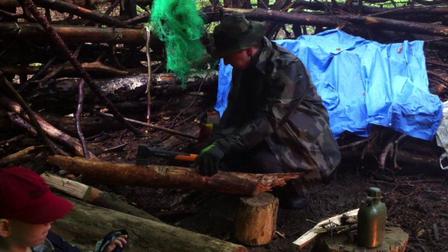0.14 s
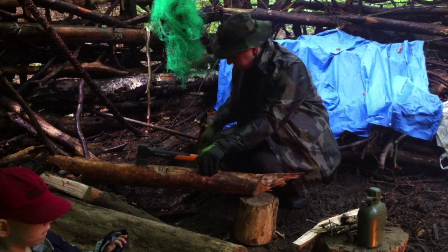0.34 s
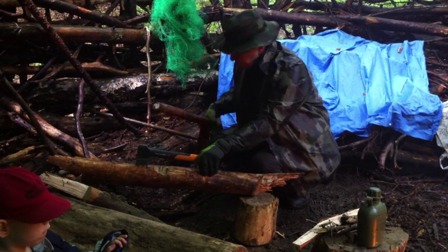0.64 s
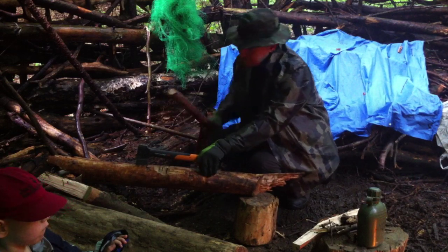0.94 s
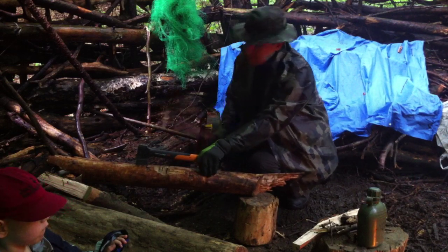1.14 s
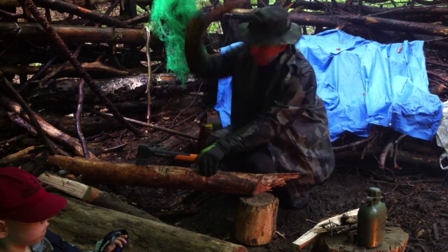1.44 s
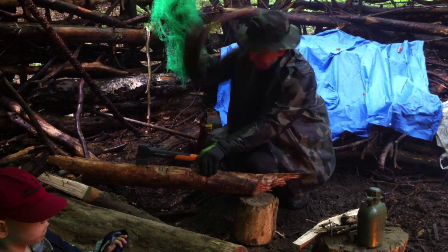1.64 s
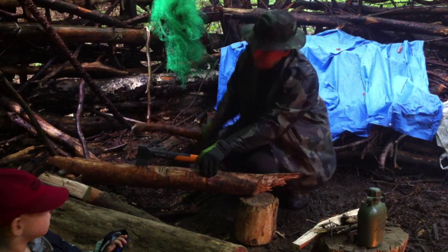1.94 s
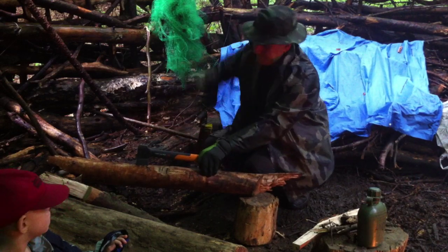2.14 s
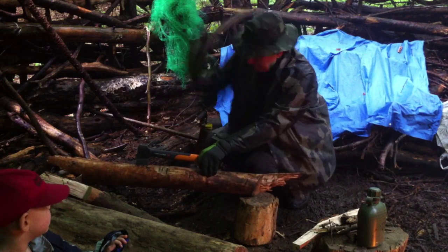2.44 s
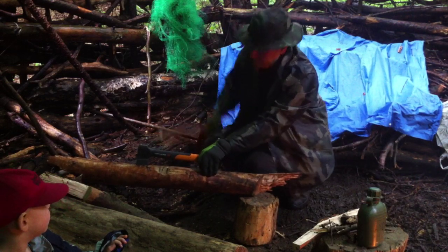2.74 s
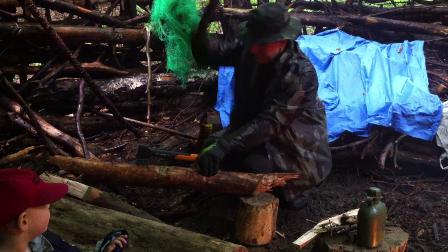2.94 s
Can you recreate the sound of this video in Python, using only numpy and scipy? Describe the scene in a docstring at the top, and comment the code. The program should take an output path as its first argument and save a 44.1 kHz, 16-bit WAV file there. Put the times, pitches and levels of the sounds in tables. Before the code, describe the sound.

Wood knocking on a hatchet in a dry log, tapping lightly, then striking hard outdoors.

```python
"""In a wood, a worker's jacket rustles over a low rumble and twigs tick underfoot. A hatchet is seated on
a hard dry log with a hollow tock, and a bird whistles far off. A wooden baton taps the hatchet, once
sharply, and the soil thuds under shifting weight. Two hard knocks then crush fibres, ring log and steel
and overload the microphone; hatchet and log clack as they settle. The woods echo each blow; the sound
of the lighter taps also bounces off the soil."""
import sys
import numpy as np
from scipy import signal
from scipy.fft import rfft, irfft, next_fast_len
from scipy.io import wavfile
from scipy.ndimage import map_coordinates

SR = 44100
rng = np.random.default_rng(int(sys.argv[2]) if len(sys.argv) > 2 else 0)


def master_out(mix):
    """Clip the mix to full scale and print it as 16-bit PCM to the path in sys.argv[1]."""
    frames = np.transpose(np.atleast_2d(mix))
    ceiling = np.clip(frames, -1, 1)
    pcm = np.round(ceiling * 32767).astype(np.int16)
    wavfile.write(sys.argv[1], SR, pcm)


N = 136710

# Cloth and leaf litter, and the low rumble beneath them
RUSTLE_LEVELS = [(0, -50), (1.0, -49.5), (3.1, -52)]  # time_s, level_db
RUSTLE_SPECTRUM = [(100, -25.5), (300, -7), (450, -9), (850, -3), (1300, -9.5), (3000, -9.5), (5500, -12),
                   (9000, -15), (15500, -22.5)]  # frequency_hz, gain_db
RUMBLE_LEVELS = [(0, -50), (2.1, -48.5), (2.3, -51.5), (2.9, -54.5), (3.03, -43), (3.1, -45.5)]  # time_s, level_db
RUMBLE_SPECTRUM = [(25, -28.5), (60, -22.5), (120, 3.5), (200, 4), (300, -3.5), (600, -13), (1500, -48)]  # frequency_hz, gain_db
# Brief wooden contacts, their click and their rattle
CONTACTS = [(0.127, -27, 0, -1, 3050), (0.3468, -29.5, -3.5, 1, 1000), (.43, -31, -1, 7, 2400),
            (0.536, -17.5, 0.5, 0, 970), (0.5733, -23, 3, -1, 1980), (0.674, -20, -1, -6, 1710),
            (.786, -25.5, -2.5, 2, 744), (0.813, -27.5, -0.5, 0, 1690), (0.902, -24, 0.5, -2, 2320),
            (1.205, -27, 0, 6.5, 2840), (1.3425, 3.5, -0.74, -3.5, 1150), (1.622, -22.5, -3.5, 6.5, 810),
            (1.6985, -11.5, 0, -3.5, 1410), (1.7041, -25.5, 0.5, 10, 1370), (1.729, -24.5, -3, 0, 1173),
            (1.819, -26.5, -2, -2, 1800), (1.939, 0, 1, 1.5, 1060), (1.9649, 3, -1.5, -2.5, 1400),
            (2.1035, -5, 2, 4.5, 800), (2.109, -11.5, -3.5, -17, 1790), (2.292, -21, 3, 6, 5500),
            (2.5134, -2, -1, 1.5, 2830), (2.737, -17.5, 5, 4, 6500), (2.846, -22, 2, 7, 2980)]  # start_s, peak_db, tilt_db_per_octave, rattle_db, spot_resonance_hz
CLICK_SPECTRUM = [(40, -32.5), (200, -28.5), (480, 6), (1100, 2), (2000, 3), (3200, -3.5), (6000, -4),
                  (15000, -21)]  # frequency_hz, gain_db
RATTLE_SPECTRUM = [(40, -39), (200, -5), (520, 0.5), (1100, -1.5), (2000, -4.5), (3200, -7), (6000, -11),
                   (15000, -21.5)]  # frequency_hz, gain_db
RATTLE_DECAY = [(300, 0.079), (1200, 0.079), (4000, 0.083), (12000, 0.076)]  # frequency_hz, t60_s
# Reverberation of the woods
ECHO_SPECTRUM = [(100, -5.5), (700, -6.5), (2000, -10), (5000, 3.5), (14000, 6.5)]  # frequency_hz, gain_db
ECHO_DECAY = [(150, 0.56), (700, 0.82), (2000, 0.8), (5000, 0.46), (12000, 0.11)]  # frequency_hz, t60_s
# Hollow modes of the blade set on the log
SEAT_MODES = [(375, -2.5, 0.073), (475, -13.5, 0.35), (546, 1, 0.023), (1052, -0.5, 0.092),
              (1237, -4, 0.08), (1505, -7, 0.11), (2610, -7, 0.02), (4190, -8.5, 0.034), (6450, -22.5, .02)]  # pitch_hz, level_db, t60_s
# Distant bird calls
BIRD_WHISTLES = [(0.196, 0.88, 5850, -59.5), (0.789, 0.58, 5760, -60), (1.178, 0.12, 4570, -53.5),
                 (1.447, 0.33, 5270, -55.5)]  # start_s, length_s, pitch_hz, level_db
# Strokes of the sleeve against the jacket
SLEEVE_STROKES = [.23, .31, .61, 1.10, 1.598]  # centre_s
# Shifts of weight on the soil
SOIL_THUDS = [(1.042, -19, 168), (1.058, -23.5, 160), (1.424, -37, 116), (1.576, -35.5, 112),
              (1.591, -32, 162), (2.035, -30.5, 129), (2.064, -30.5, 160)]  # start_s, peak_db, pitch_hz
# Hard blows of the baton
HARD_BLOWS = [(1.8539, 11.5, 966, -28), (2.666, 13, 1600, -11.5)]  # start_s, level_db, favoured_band_hz, splinter_db
# Modes of the log with the hatchet in it, and of the steel head
LOG_MODES = [(468, -17.5, .08), (588.2, -9.5, 0.07), (687, -5, 0.091), (804, -9, 0.064), (1016, -26, 0.25),
             (1233, -4.5, 0.031), (1424, -6, 0.051), (1600, -3, 0.019), (1838, -1.5, 0.042),
             (1914, -12.5, 0.074), (1974, -18, 0.066), (2508, -16.5, 0.12), (3400, -27.5, 0.042)]  # pitch_hz, level_db, t60_s
STEEL_MODES = [(1040, -48.5, 1), (1510, -50.5, 1), (2500, -43, 0.81)]  # pitch_hz, level_db, t60_s
# Noise of crushed fibres
CRUNCH_SPECTRUM = [(30, -20), (200, -21), (350, -14.5), (600, 4), (1700, 3), (2800, -8.5), (6000, -16.5),
                   (15000, -23)]  # frequency_hz, gain_db
CRUNCH_DECAY = [(100, 0.2), (800, 0.095), (3000, 0.11), (12000, 0.1)]  # frequency_hz, t60_s


def amp(db):
    """Amplitude grows tenfold every 20 dB."""
    return 10 ** (np.asarray(db) / 20)


def unit(x):
    """Normalisation to rms 1."""
    return x / np.sqrt(np.mean(x ** 2) + 1e-20)


def along(points, hz):
    """Interpolation of (frequency_hz, value) points on a log axis."""
    frequencies, values = np.transpose(points)
    return np.interp(np.log(hz + 1), np.log(frequencies + 1), values)


def curve(rows):
    """Linear interpolation of (time_s, value) rows at every sample."""
    return np.interp(np.arange(N) / SR, *np.transpose(rows))


def bell(hz, centre_hz, width_oct):
    """A resonance peak of height 1, Gaussian in log frequency."""
    return np.exp(-.5 * (np.log2((hz + 1) / centre_hz) / width_oct) ** 2)


def wobble(knots_per_s):
    """Slow modulation: a spline through random knots."""
    knots = rng.standard_normal(int(N * knots_per_s / SR) + 4)
    return map_coordinates(knots, [np.arange(N) * knots_per_s / SR])


def filtered(x, response):
    """Linear filtering multiplies the spectrum by a frequency response."""
    size = next_fast_len(len(x) + SR // 10)
    return irfft(rfft(x, size) * response(np.fft.rfftfreq(size, 1 / SR)), size)[:len(x)]


def noise(spectrum, size):
    """Filtering colours white noise; the result has rms 1."""
    return unit(filtered(rng.standard_normal(size), lambda hz: amp(along(spectrum, hz))))


def burst(spectrum, decay):
    """Frequency-dependent damping: each band of a one-second noise dies at its own rate."""
    hz, t, bands = signal.stft(noise(spectrum, SR), SR, nperseg=128)
    damping = amp(-60 * t / along(decay, hz)[:, None])
    return signal.istft(bands * damping, SR, nperseg=128)[1][:SR]


def click(gain):
    """Minimum phase gives the sharpest causal pulse with a given spectrum."""
    cepstrum = irfft(np.log(np.maximum(gain(np.fft.rfftfreq(4096, 1 / SR)), 1e-6)))
    half = len(cepstrum) // 2
    causal = np.r_[cepstrum[0], 2 * cepstrum[1:half], np.zeros(half)]
    return irfft(np.exp(rfft(causal)))


def gritty(x, depth_db=3.5):
    """Fibres yield in uneven snaps: fast amplitude modulation that keeps the mean power."""
    return x * unit(amp(depth_db * wobble(knots_per_s=800)))[:len(x)]


def blurred(phase, width_hz):
    """Random modulation spreads a tone into a narrow band of rms 1."""
    drift = lambda: filtered(rng.standard_normal(len(phase)), lambda hz: np.exp(-.5 * (hz / width_hz)**2))
    return unit(drift() * np.cos(phase) + drift() * np.sin(phase))


def add(track, start_s, sound):
    """Superposition: a sound sums into the track from start_s."""
    part = track[round(start_s * SR):][:len(sound)]
    part += sound[:len(part)]


def rustle(crackles_per_s=71, crackle_db=-11):
    """Friction in cloth and litter gives fluctuating noise with tiny crackles."""
    impulses = (rng.random(N) < crackles_per_s / SR) * rng.standard_normal(N)
    crackles = unit(filtered(impulses, lambda hz: amp(along(RUSTLE_SPECTRUM, hz))))
    cloth = noise(RUSTLE_SPECTRUM, N) * amp(1.1 * wobble(knots_per_s=20))
    return amp(curve(RUSTLE_LEVELS) + 1.5) * (cloth + amp(crackle_db) * crackles)


def rumble():
    """Slow amplitude modulation makes a low noise swell and sink."""
    return amp(curve(RUMBLE_LEVELS) + 2 * wobble(knots_per_s=3.7)) * noise(RUMBLE_SPECTRUM, N)


def taps(spot_db=5, bounce_s=.007, bounce_db=-17.5, soil_cutoff_hz=2460):
    """An impact's click, soil reflection and rattle all carry the resonance of the struck spot."""
    out = np.zeros(N)
    for start_s, peak_db, tilt_db_per_octave, rattle_db, spot_hz in CONTACTS:
        tilt = lambda hz: tilt_db_per_octave * np.log2(np.maximum(hz, 200) / 2000)
        tint = lambda hz: amp(tilt(hz) + spot_db * (bell(hz, spot_hz, width_oct=.3) - .5))
        snap = click(lambda hz: amp(along(CLICK_SPECTRUM, hz)) * tint(hz))
        snap = amp(peak_db) * snap / np.abs(snap).max()
        bounce = filtered(snap, lambda hz: 1 / (1 + 1j * hz / soil_cutoff_hz))
        rattle = filtered(gritty(burst(RATTLE_SPECTRUM, RATTLE_DECAY)), tint)
        add(out, start_s, snap)
        add(out, start_s + bounce_s, amp(bounce_db) * bounce)
        add(out, start_s, amp(peak_db + rattle_db - 16) * rattle)
    return out


def echo(x, rise_s=.0064, shelter_db=-16.5, shelter_t60_s=.45, trees_db=-21.5):
    """Scattering: a stick shelter returns a short reverberation, the trees a faint longer one."""
    t = np.arange(SR) / SR
    rise = 1 - np.exp(-t / rise_s)
    shelter = rise * noise(ECHO_SPECTRUM, SR) * amp(-60 * t / shelter_t60_s)
    trees = rise * burst(ECHO_SPECTRUM, ECHO_DECAY)
    response = amp(shelter_db) * shelter / np.linalg.norm(shelter)
    response += amp(trees_db) * trees / np.linalg.norm(trees)
    return signal.fftconvolve(x, response)[:N]


def blade_seating(start_s=.1574, snap_db=-8, chatter_db=-28, chatter_t60_s=.13, ring_db=-29.5):
    """Resonance: the blade snaps down and chatters on the bark through a few modes, which ring on."""
    out, t = np.zeros(N), np.arange(SR) / SR
    floor = amp(-17)  # gain between the resonances
    hollow = lambda hz: floor + sum(amp(db) * bell(hz, mode_hz, .21) for mode_hz, db, _ in SEAT_MODES)
    snap = click(hollow)
    chatter = gritty(unit(filtered(rng.standard_normal(SR), hollow))) * amp(-60 * t / chatter_t60_s)
    ring = sum(amp(db - 60 * t / t60_s) * blurred(2 * np.pi * hz * t, width_hz=.029 * hz)
               for hz, db, t60_s in SEAT_MODES)
    add(out, start_s, amp(snap_db) * snap / np.abs(snap).max())
    add(out, start_s, amp(chatter_db) * chatter + amp(ring_db) * ring)
    return out


def bird(fall_hz_per_s=240):
    """Scattering by the trees smears each thin, slightly falling whistle."""
    out, t = np.zeros(N), np.arange(SR) / SR
    for start_s, length_s, pitch_hz, level_db in BIRD_WHISTLES:
        swell = np.sqrt(np.abs(np.sin(np.pi * np.minimum(t / length_s, 1))))
        phase = 2 * np.pi * np.cumsum(pitch_hz - fall_hz_per_s * t) / SR
        add(out, start_s, amp(level_db) * swell * blurred(phase, width_hz=148))
    return out


def sleeve(level_db=-46, width_s=.014):
    """Sliding friction on waterproof cloth gives brief swishes of high noise."""
    t = np.arange(N) / SR
    strokes = sum(np.exp(-.5 * ((t - centre_s) / width_s) ** 2) for centre_s in SLEEVE_STROKES)
    hiss = unit(filtered(rng.standard_normal(N), lambda hz: bell(hz, centre_hz=9400, width_oct=1)))
    return amp(level_db) * strokes * hiss


def thuds(rise_s=.0044):
    """Shifting weight pushes soft soil for a few cycles; the sound follows the push's rate of change."""
    out, t = np.zeros(N), np.arange(SR // 10) / SR
    swell = (t / rise_s * np.exp(1 - t / rise_s)) ** 2
    for start_s, peak_db, pitch_hz in SOIL_THUDS:
        pressure = np.gradient(-swell * np.cos(2 * np.pi * pitch_hz * t))
        add(out, start_s, amp(peak_db) * pressure / np.abs(pressure).max())
    return out


def knocks(emphasis_db=6.5, attack_s=.00093, crunch_db=-8):
    """A blow crushes fibres and excites damped modes of log and steel; where it lands favours a band."""
    out, t = np.zeros(N), np.arange(SR) / SR
    for start_s, level_db, band_hz, splinter_db in HARD_BLOWS:
        emphasis = lambda hz: emphasis_db * (bell(hz, band_hz, width_oct=.7) - 1)
        fade = lambda hz, db, t60_s: amp(db + emphasis(hz) - 60 * t / t60_s)
        wood = sum(fade(hz, db, t60_s) * np.sin(2 * np.pi * (hz * t + rng.random()))
                   for hz, db, t60_s in LOG_MODES)
        steel = sum(fade(hz, db, t60_s) * blurred(2 * np.pi * hz * t, width_hz=105)
                    for hz, db, t60_s in STEEL_MODES)
        ring = (wood + steel) * (1 - np.exp(-t / attack_s))
        add(out, start_s, amp(level_db + splinter_db) * splinters())
        crunch = amp(crunch_db) * gritty(burst(CRUNCH_SPECTRUM, CRUNCH_DECAY))
        add(out, start_s, amp(level_db) * (ring + crunch))
    return out


def splinters(snaps_per_s=440, t60_s=.17):
    """Brittle fracture: single fibres snap brightly, fading as the split stops opening."""
    t = np.arange(SR) / SR
    snaps = (rng.random(SR) < snaps_per_s / SR) * rng.standard_normal(SR)
    return filtered(snaps * amp(-60 * t / t60_s), lambda hz: bell(hz, centre_hz=6500, width_oct=.96))


def scene():
    """Superposition of the work on the log, its echo and the quiet sounds around it."""
    work = knocks() + taps() + blade_seating() + thuds()
    return (work + echo(work) + sleeve() + bird() + rustle() + rumble())[None]


def record(dry):
    """Automatic gain control ducks too late for the hard blows, which saturate, and recovers slowly."""
    threshold_db, depth_db, attack_s, recovery_db_per_s = -18, 6, .017, 5.5
    ceiling, cutoff_hz = .97, 15800
    x, window = dry[0], round(attack_s * SR)
    lagged = lambda v: signal.fftconvolve(v, np.ones(window) / window)[:N]
    level_db = 10 * np.log10(np.abs(lagged(x ** 2)) + 1e-12)
    over_db = np.clip(level_db - threshold_db, 0, depth_db)
    recovery_db = recovery_db_per_s * np.arange(N) / SR
    duck_db = lagged(np.maximum.accumulate(over_db + recovery_db) - recovery_db)  # sinking peak hold
    saturated = np.clip(x * amp(-duck_db), -ceiling, ceiling)
    return filtered(saturated, lambda hz: 1 / (1 + (hz / cutoff_hz) ** 100))[None]


dry = scene()
out = record(dry)
master_out(out)
```